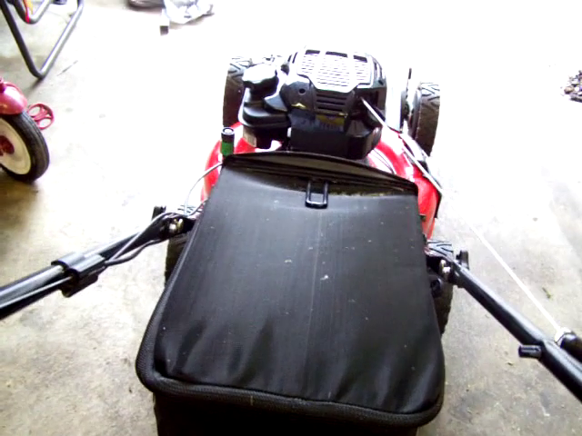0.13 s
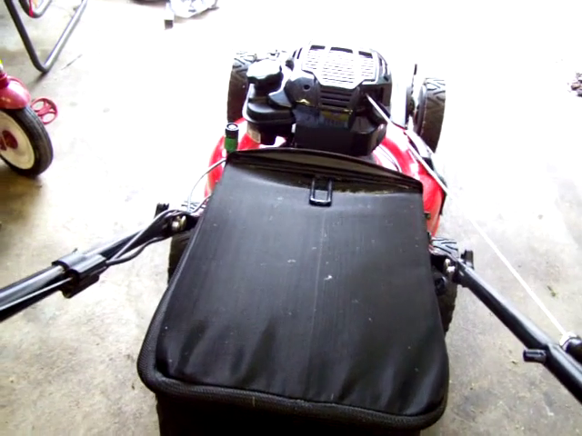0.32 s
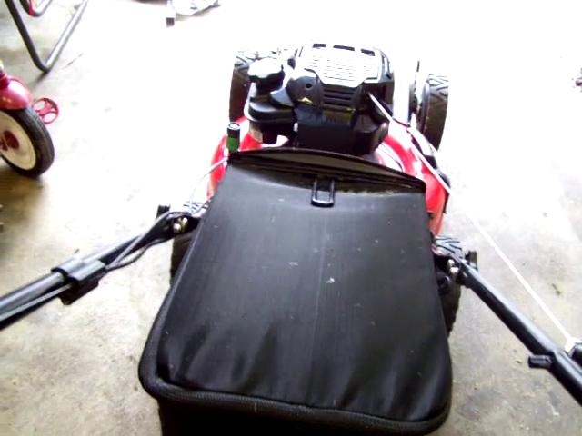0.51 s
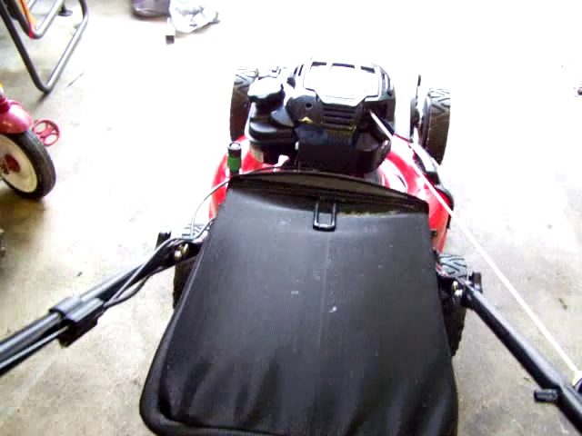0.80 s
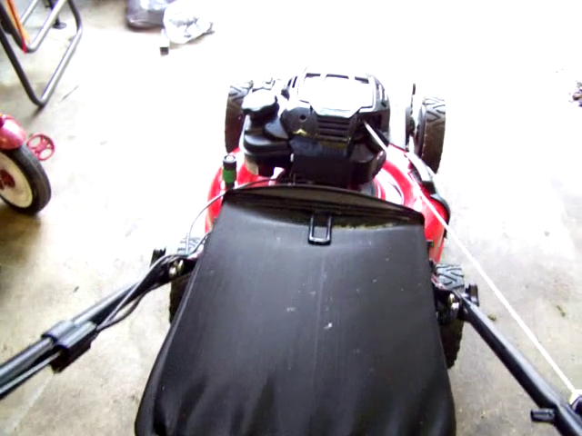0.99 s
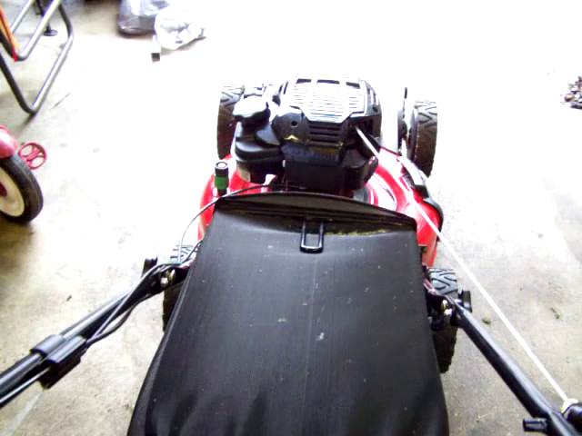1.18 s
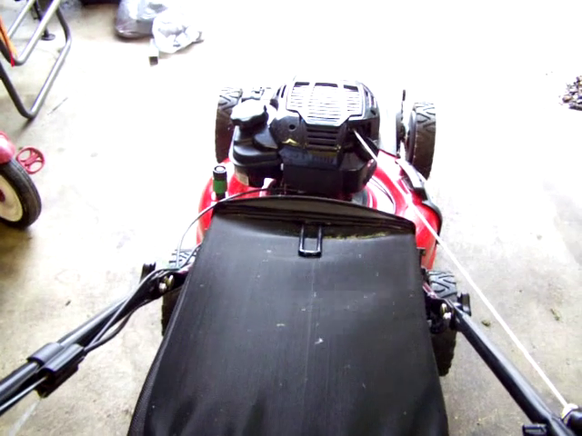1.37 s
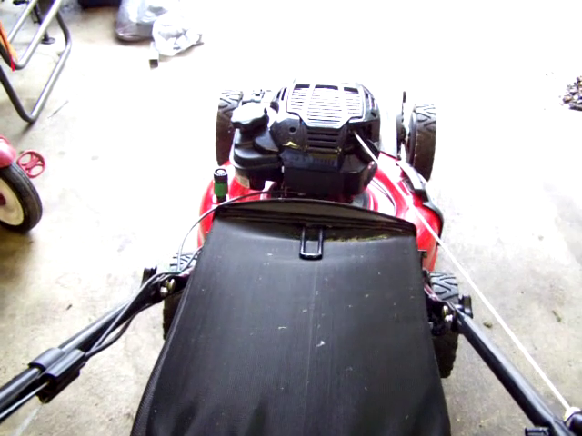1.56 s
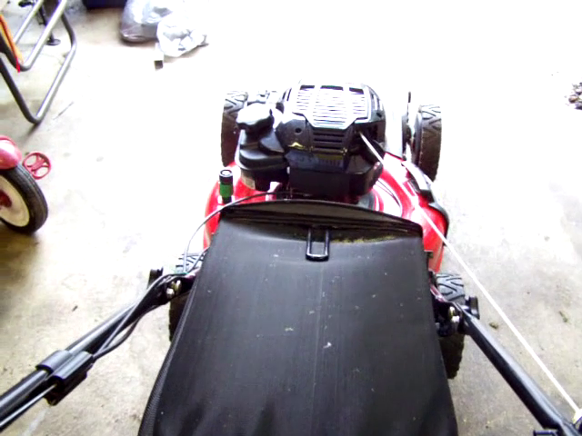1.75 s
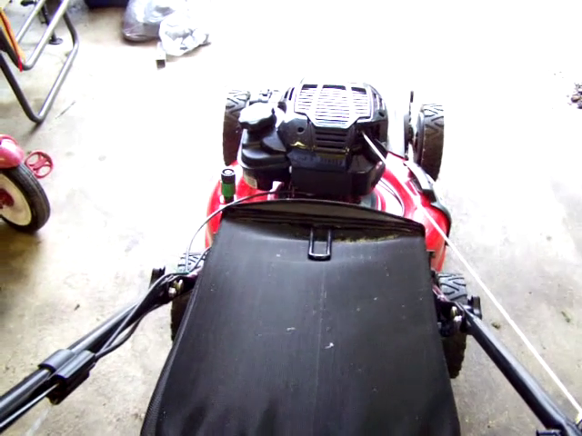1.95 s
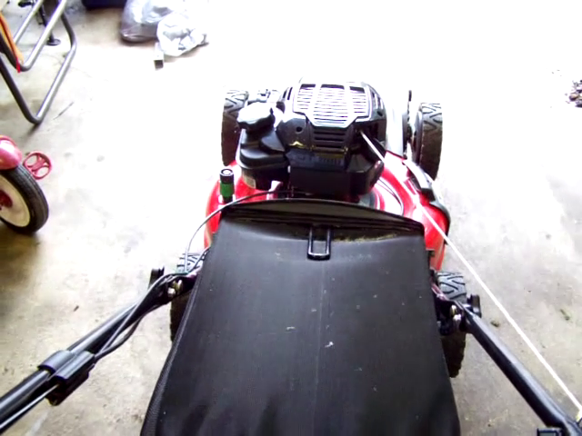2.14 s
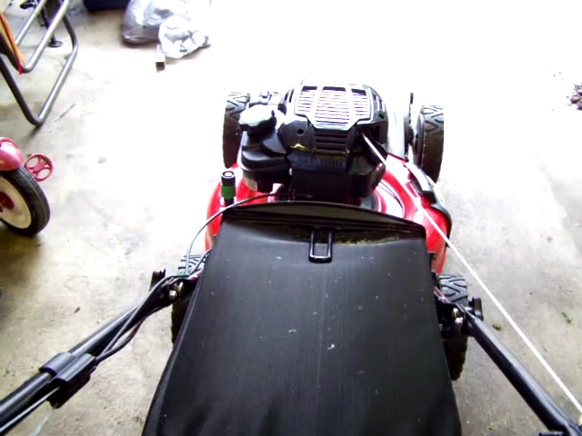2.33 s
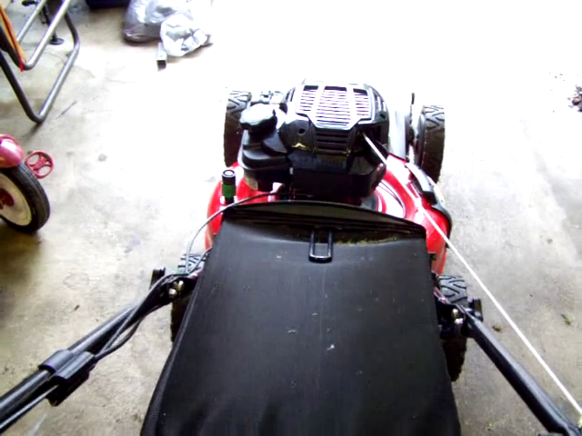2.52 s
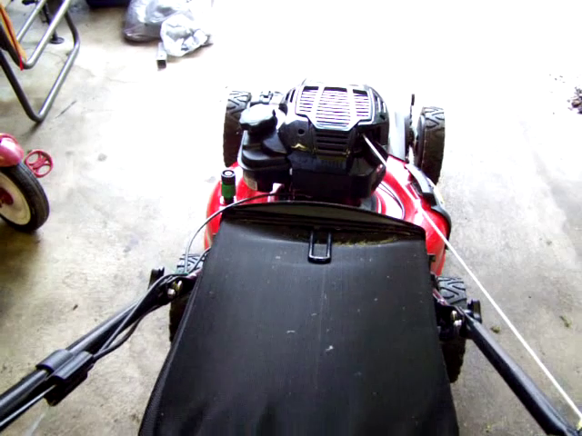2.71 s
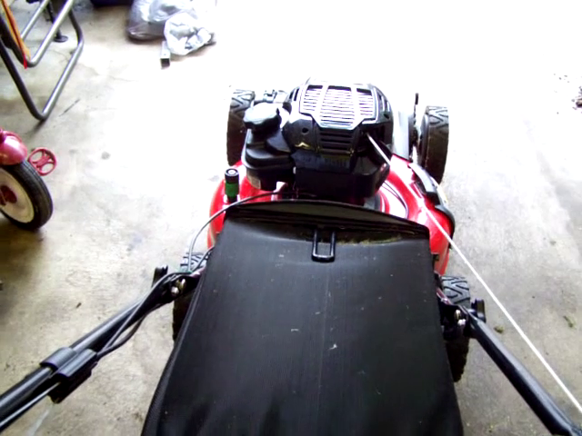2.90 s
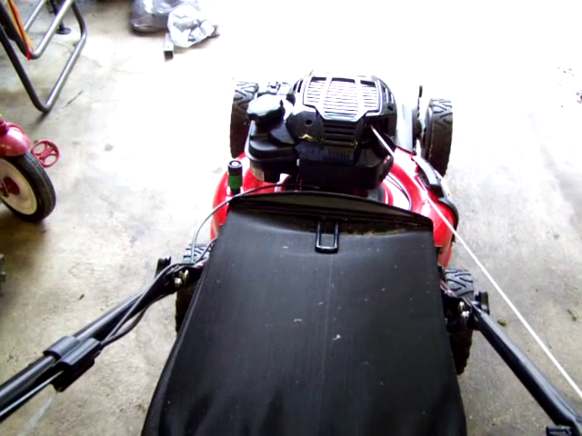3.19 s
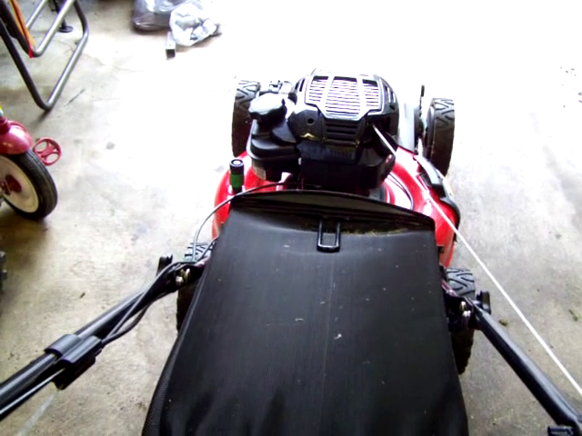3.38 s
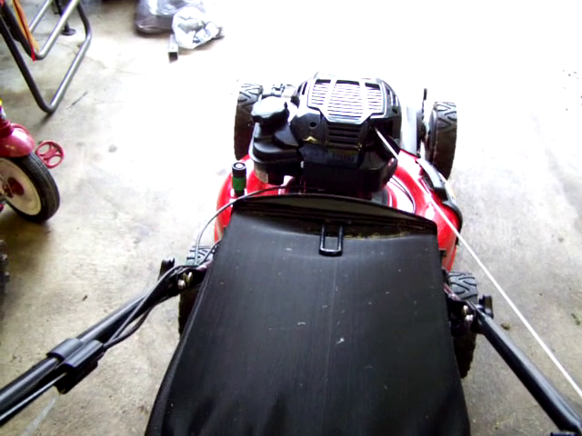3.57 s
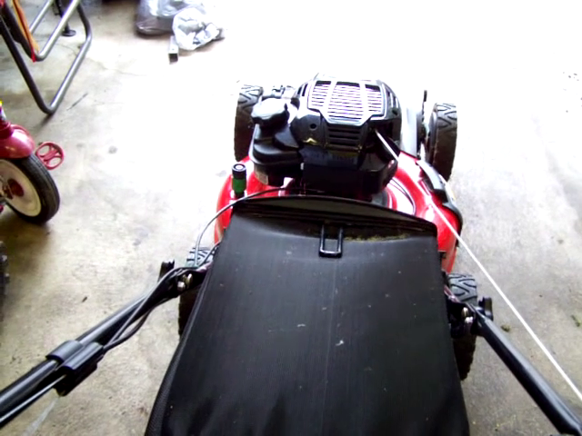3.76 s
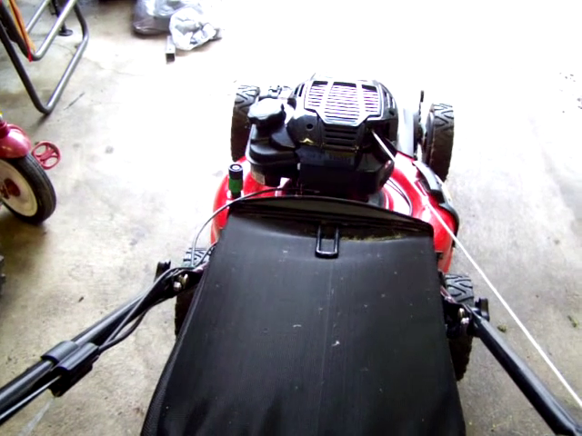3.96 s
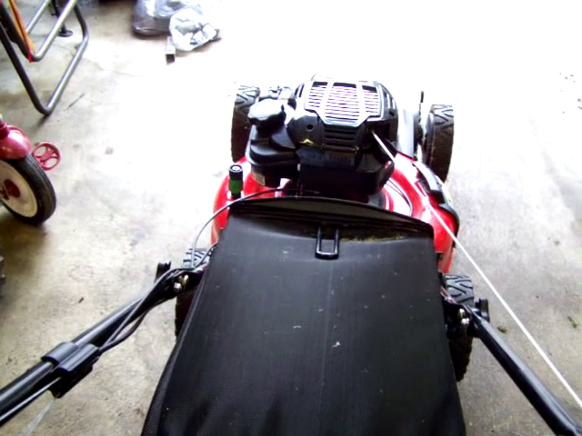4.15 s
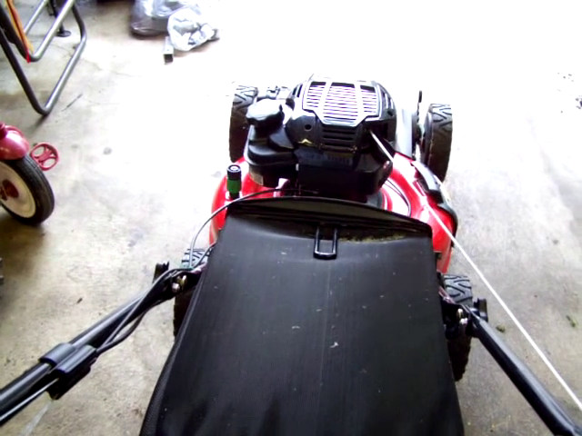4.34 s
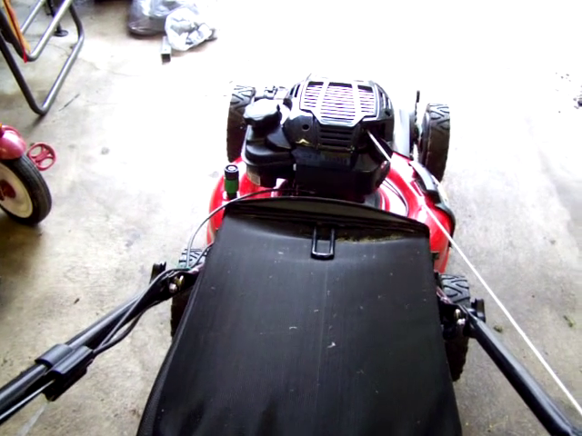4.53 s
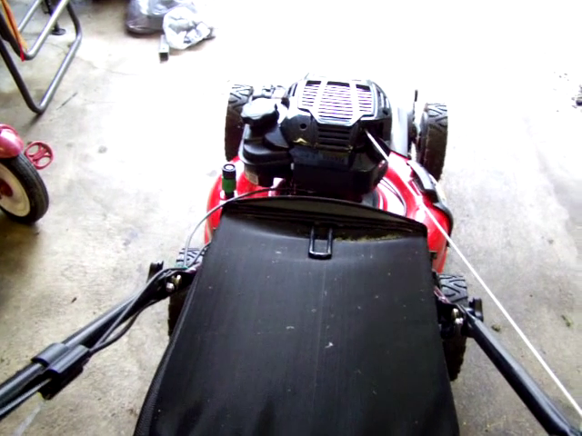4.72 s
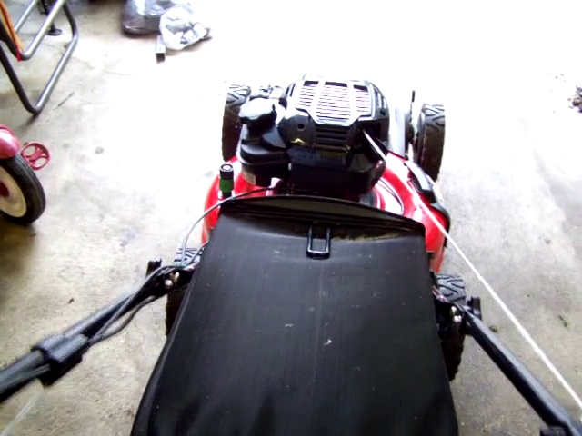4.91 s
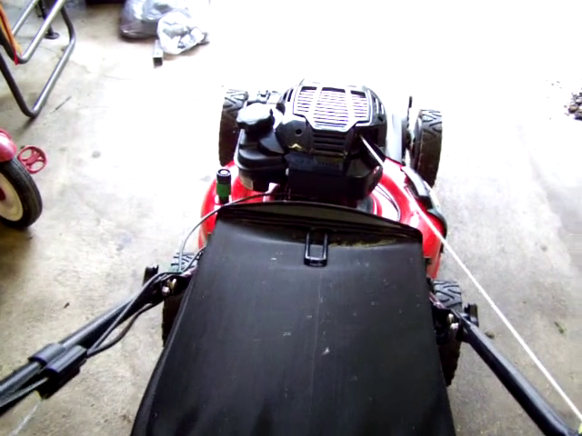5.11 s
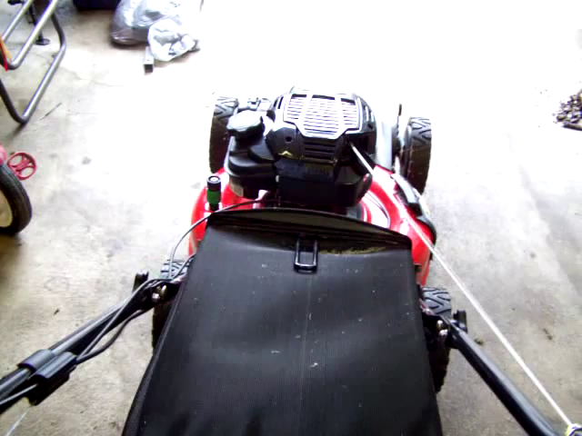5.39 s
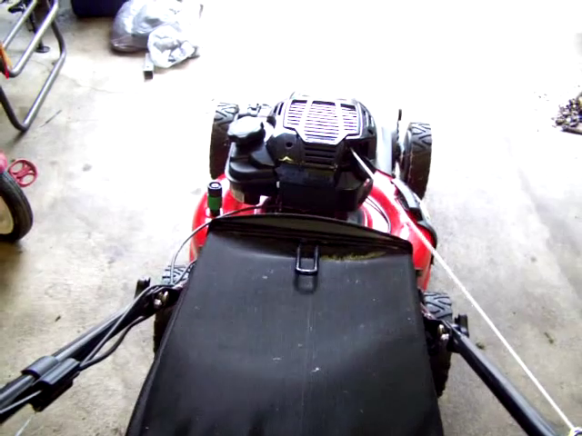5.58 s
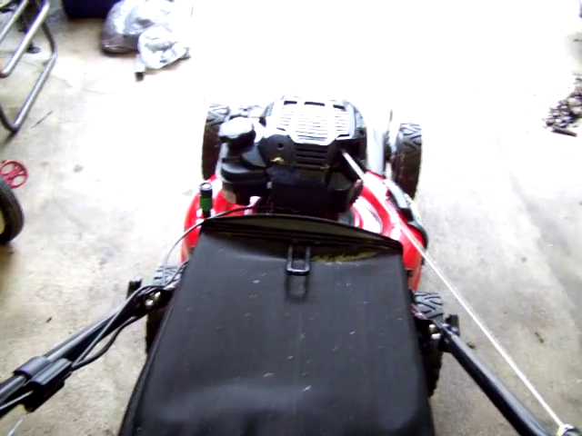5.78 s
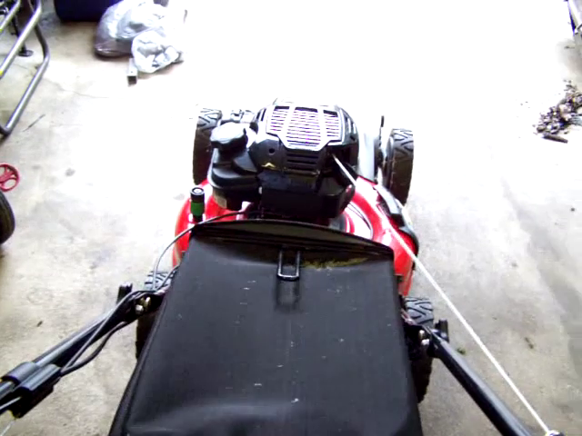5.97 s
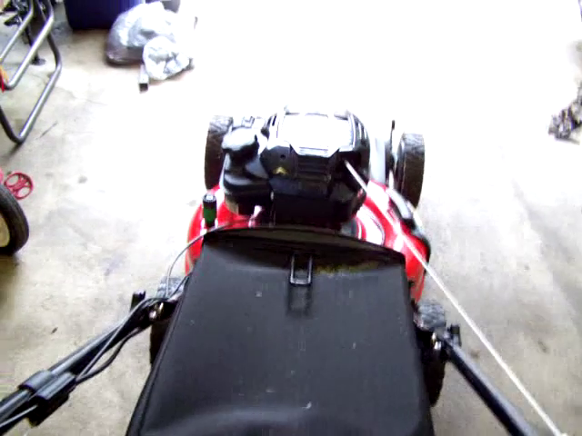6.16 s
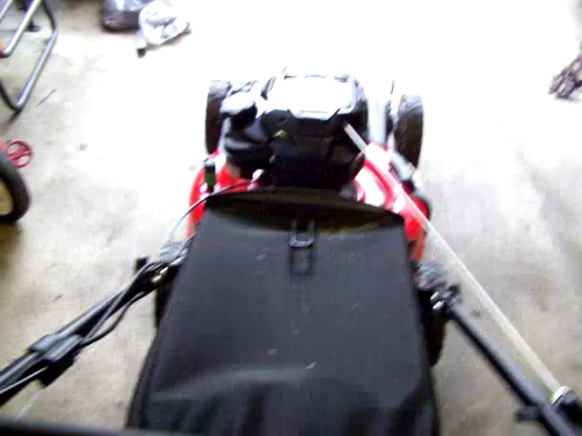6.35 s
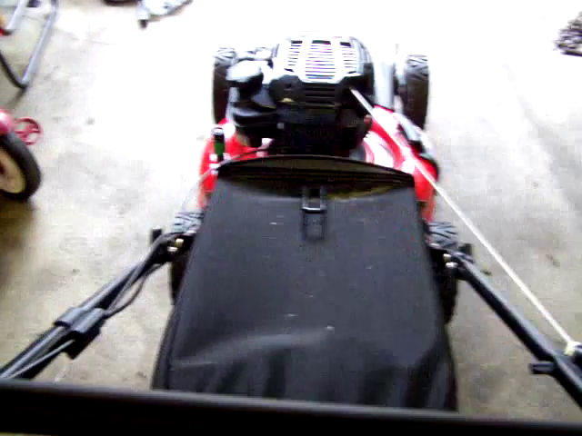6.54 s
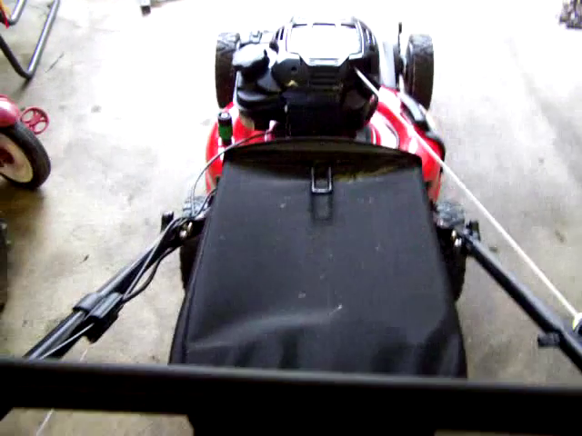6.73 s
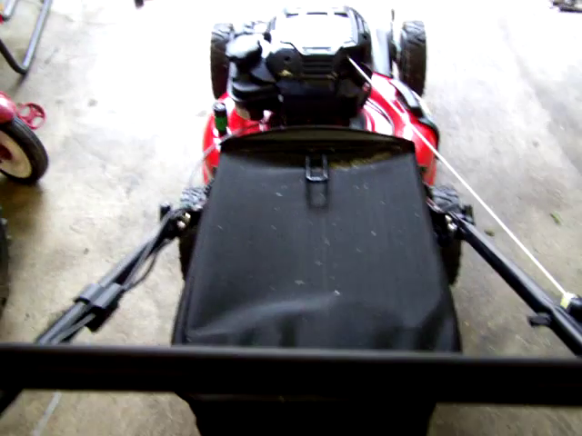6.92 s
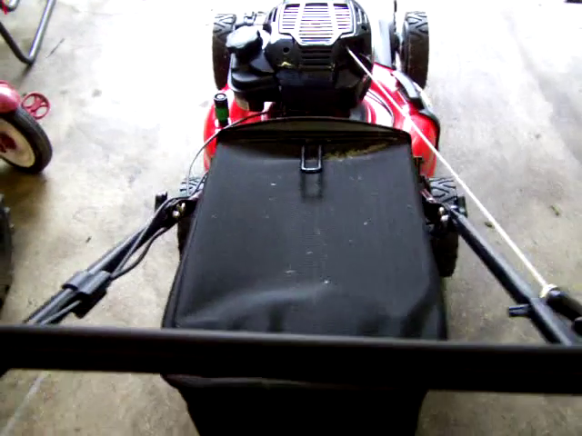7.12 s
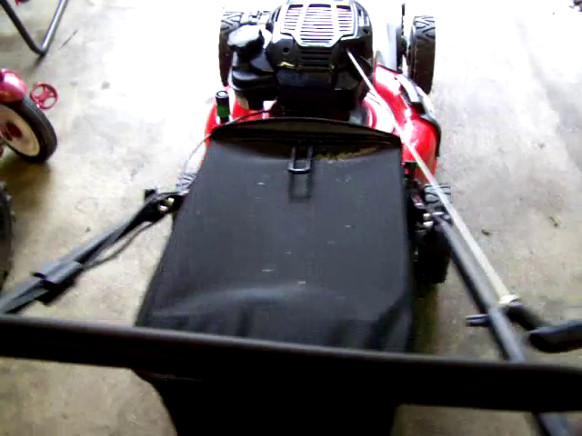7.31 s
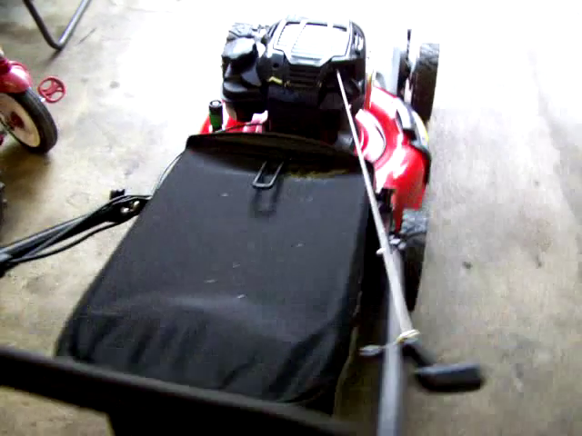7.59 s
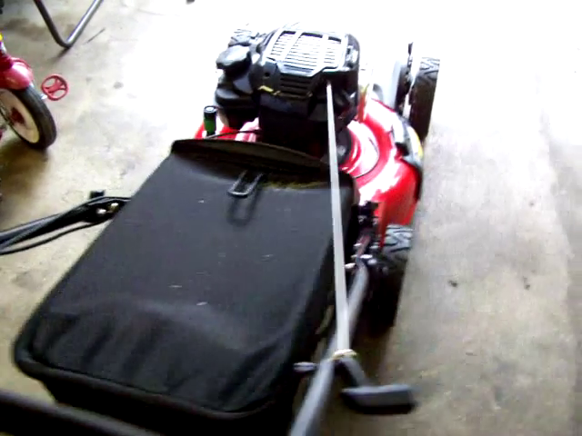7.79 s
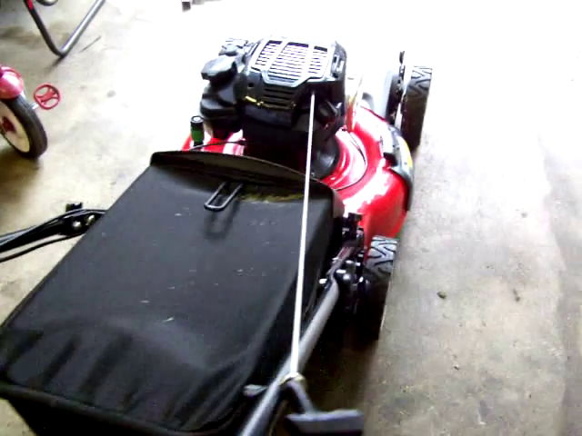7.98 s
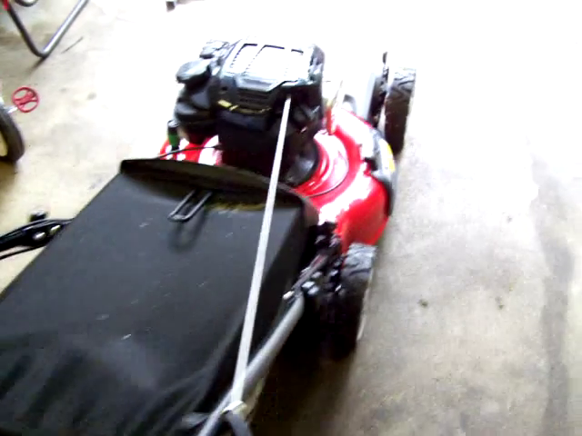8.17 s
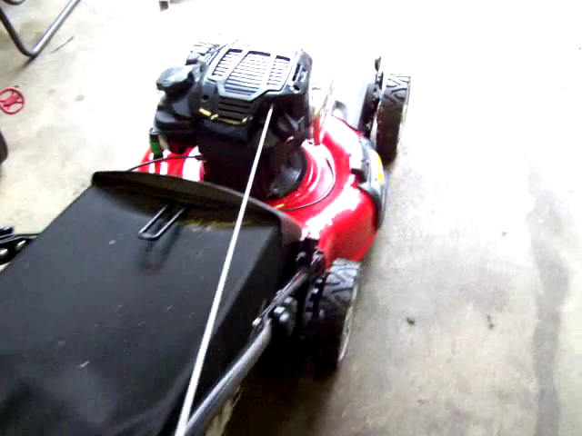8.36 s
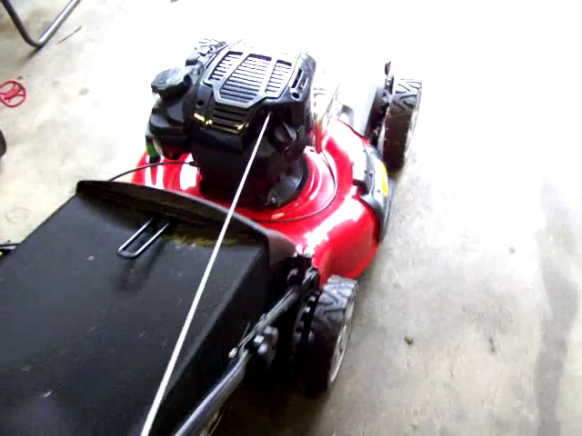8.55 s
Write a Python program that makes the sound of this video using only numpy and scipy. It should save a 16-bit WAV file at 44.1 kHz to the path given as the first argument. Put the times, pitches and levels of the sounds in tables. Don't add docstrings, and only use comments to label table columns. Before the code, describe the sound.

From 0 to about 4.95 seconds a small single-cylinder petrol mower runs at nearly constant speed in a garage: a dense low-mid buzzing drone, fluttering blade wind and metallic deck rattle, with little treble at the very top. At 4.96 the ignition is cut; the firing tone collapses and harmonics glide down quickly until about 5.4. From 5.3 to 5.9 uneven unfired strokes puff, thump, honk and hiss, about a tenth of a second apart, with short thin brake squeals from 5.6. The blade stops at 6.0. The recorder's gain has risen, exposing a distant motor's unsteady hum and soft hiss. At 6.07 comes a loud sharp plastic snap with faint metallic ringing, then ticks and dry finger rubbing until 6.9, more clicks and scuffs around 6.95 to 7.17. Mostly hum follows, slightly thinner after 7.7, with a rub and faint knocks near 8.05 and tiny ones at 8.4 and 8.5.

```python
import sys
import numpy as np
from scipy import signal
from scipy.fft import rfft, irfft, next_fast_len
from scipy.io import wavfile

SR = 44100
rng = np.random.default_rng(int(sys.argv[2]) if len(sys.argv) > 2 else 0)


def inscribe(sig):
    pcm = np.round(np.clip(np.atleast_2d(sig).T, -1, 1) * 32767)
    wavfile.write(sys.argv[1], SR, pcm.astype(np.int16))


def attenuation_scalar(level_db):
    decades = np.asarray(level_db, float) / 20
    return 10 ** decades


N = 379260

CUT_S, STROKES_END_S, STANDSTILL_S = 4.96, 5.785, 5.99


def rms_one(x):
    return x / np.sqrt(np.mean(x ** 2) + 1e-20)


def after(s):
    return np.maximum(np.arange(N) / SR - s, 0)


def drift(rate):
    r = np.exp(-80 * np.pi * rate / SR)
    slow = signal.lfilter([1], [1, -2 * r, r * r], rng.standard_normal(N // 40 + 2002))[2000:]
    return np.interp(np.arange(N) / 40, np.arange(len(slow)), rms_one(slow - slow.mean()))


def resonance(x, hz, width_hz):
    r = np.exp(-np.pi * width_hz / SR)
    top = np.array([1, 0, -1]) * (1 - r * r) / 2
    return signal.lfilter(top, [1, -2 * r * np.cos(2 * np.pi * hz / SR), r * r], x + 1e-18)


def ring(x, hz, t60):
    r, w = attenuation_scalar(-60 / (t60 * SR)), 2 * np.pi * hz / SR
    return signal.lfilter([0, np.sin(w)], [1, -2 * r * np.cos(w), r * r], x + 1e-18)


def above(x, hz):
    return signal.sosfilt(signal.butter(2, hz, "high", fs=SR, output="sos"), x)


def band(low_hz, high_hz):
    edges = signal.butter(2, [low_hz, high_hz], "band", fs=SR, output="sos")
    return rms_one(signal.sosfilt(edges, rng.standard_normal(N)))


def coloured(spectrum, patchy_db):
    size = next_fast_len(N)
    log_hz = np.log(np.arange(1, size // 2 + 2) * SR / size)
    points = np.array(spectrum)
    place = np.log(points[:, 0])
    shaped = rfft(rng.standard_normal(size)) * attenuation_scalar(np.interp(log_hz, place, points[:, 1], -90, -90))
    centres = np.linspace(place[0], place[-1], num=4)
    total = np.zeros(N)
    for one in np.eye(4):
        region = irfft(shaped * np.interp(log_hz, centres, one), size)[:N]
        total += region * attenuation_scalar(patchy_db * drift(2.0))
    return rms_one(total)


def crank_speed():
    # (time [s], speed [cycles/s])
    governed = [(0, 26.32), (.5, 26.28), (.9, 26.3), (1.2, 26.42), (2, 26.35), (2.35, 26.49), (2.6, 26.45),
                (2.9, 26.33), (3.5, 26.36), (3.9, 26.3), (4.6, 26.34), (4.94, 26.42)]
    s, speed = np.transpose(governed)
    braking_per_s2, creep = 27, 5
    return np.maximum(np.interp(np.arange(N) / SR, s, speed) - braking_per_s2 * after(CUT_S), creep)


def crank_angle():
    return 2 * np.pi * np.cumsum(crank_speed()) / SR


def coasting_db(run_db, step_db, sag_db, late_sag_db):
    return (run_db + step_db * np.minimum(after(CUT_S) / .03, 1) - sag_db * after(CUT_S)
            - late_sag_db * after(STROKES_END_S) - 609 * after(STANDSTILL_S))


def engine():
    # (multiple of the cycle rate, level [dB])
    harmonics = [(2, -25), (3, -25), (4, -14), (5, -12), (6, -4), (8, 0), (9, -15), (10, -10), (11, -12),
                 (12, -17), (14, -8), (15, -18), (16, -12), (17, -11), (18, -12), (19, -17), (20, -9),
                 (24, -5), (25, -18), (27, -18), (28, -4), (29, -14), (33, -16), (34, -18), (36, -9),
                 (37, -16), (40, -15), (42, -18), (44, -14), (52, -15)]
    # (frequency [Hz], level [dB per Hz])
    rumble_spectrum = [(30, -49), (60, -37.5), (120, -33), (190, -10), (240, -9.5), (310, -13.5),
                       (400, -7.5), (470, -3), (600, -7), (770, -4.5), (820, -9.5), (1100, -22),
                       (1430, -37), (2400, -91.5)]
    rattle_spectrum = [(530, -27), (900, -4.5), (1100, -1.5), (1200, 2), (1235, 1.5), (1290, 1.5),
                       (1350, 2.5), (1390, 0), (1510, 3), (1545, -5), (1650, -0.5), (2100, -3),
                       (2600, -7.5), (4000, -56)]
    wind_spectrum = [(1060, -18.5), (1800, -13.5), (2570, -8), (4050, -1), (6030, -17), (7320, -17),
                     (7990, -4), (10400, -51.5), (17600, -120)]
    # (running [dB], step at the cut [dB], coasting sag [dB/s], sag after last stroke [dB/s])
    rumble_level = (-29.5, 5.5, 3.3, 57)
    rattle_level = (-22, 1.4, 7.5, 37)
    wind_level = (-17.5, -0.54, 5, 4.5)

    angle = crank_angle()
    wobbles = [drift(5.4) for _ in range(6)]
    tones = np.zeros(N)
    for k, (multiple, db) in enumerate(harmonics):
        phase = rng.uniform(0, 2 * np.pi) + 0.082 * wobbles[(k + 3) % 6]
        tones += attenuation_scalar(db + 0.65 * wobbles[k % 6]) * np.sin(multiple * angle + phase)
    firing_db = -24.5 - 905 * after(CUT_S)

    rumble = attenuation_scalar(coasting_db(*rumble_level)) * coloured(rumble_spectrum, patchy_db=0.8)
    rattle_db = coasting_db(*rattle_level) + 1.0 * np.cos(4 * angle + .6)
    rattle = attenuation_scalar(rattle_db) * coloured(rattle_spectrum, patchy_db=-1.5)
    throb_db = 0.85 * np.cos(4 * angle) + 0.38 * np.cos(angle)
    wind = attenuation_scalar(coasting_db(*wind_level) + throb_db) * coloured(wind_spectrum, patchy_db=0.57)
    return attenuation_scalar(firing_db) * rms_one(tones) + rumble + rattle + wind


def background():
    # (frequency [Hz], level [dB])
    hum_lines = [(61.2, -1), (114.5, -5), (122.5, 0), (127.5, -12), (157, -7), (183.6, -9), (245, 2.5),
                 (254.5, -27.5), (306, -9.5), (369.5, -12), (490, -6.5), (551, -13.5), (611, -20.5),
                 (673, -13.5)]
    # (frequency [Hz], level [dB per Hz])
    low_spectrum = [(18, -37), (30, -4.5), (123, -0.5), (194, -6.5), (248, -3.5), (405, -4), (485, -7.5),
                    (630, -3.5), (1500, -7), (1950, -41), (3300, -120)]
    hiss_spectrum = [(590, -37), (1000, -10), (1400, -8), (2370, -6), (2750, -4.5), (3350, -2),
                     (3800, -4.5), (4300, -9.5), (5450, -18.5), (7000, -26.5), (8000, -6), (8600, -24.5),
                     (12000, -90)]

    gain_db = -22.5 * np.exp(-after(CUT_S) / 0.15)
    turned = np.minimum(after(7.7) / .12, 1)

    t, hum = np.arange(N) / SR, np.zeros(N)
    for hz, db in hum_lines:
        line_db = db + 1.2 * drift(1.5) - 3 * turned * (hz < 300)
        hum += attenuation_scalar(line_db) * np.sin(2 * np.pi * (hz * t + rng.random()))
    hum *= attenuation_scalar(-32 + gain_db) / np.std(hum[:SR])

    low = attenuation_scalar(-34.5 + 0.35 * gain_db) * coloured(low_spectrum, patchy_db=0.4)
    hiss = attenuation_scalar(-28.5 + gain_db + 1.1 * turned) * coloured(hiss_spectrum, patchy_db=.8)
    gathered = rms_one(resonance(rng.standard_normal(N), 3280, 330))
    gathered *= turned * attenuation_scalar(-32.5 - 40 * after(6.9))
    return gathered + hum + low + hiss


def glides():
    multiples = [3, 4, 8, 12, 20, 24, 30]
    # (frequency [Hz], width [Hz], level [dB])
    passages = [(72, 12, -32), (170, 24, -25.5), (232, 14, -26), (286, 20, -26), (362, 20, -29),
                (465, 40, -27)]

    speed, angle = crank_speed(), crank_angle()
    total = np.zeros(N)
    for multiple in multiples:
        tone = attenuation_scalar(1.7 * drift(24.0)) * np.sin(multiple * angle + rng.uniform(0, 2 * np.pi))
        total += tone * sum(attenuation_scalar(db) * np.exp(-((multiple * speed - hz) / width_hz) ** 2)
                            for hz, width_hz, db in passages)
    fade_in, fade_out = after(CUT_S) / .02, 1 - after(5.36) / .05
    return total * np.clip(np.minimum(fade_in, fade_out), 0, 1)


def burst(s, rise_s, decay_s):
    t = after(s)
    return (1 - np.exp(-t / rise_s)) * np.exp(-t / decay_s)


def pipe(push, modes):
    fall = np.exp(-1 / (.004 * SR))
    gust = signal.lfilter([3 * (1 - fall)], [1, -fall], above(push, 90))
    gust = gust * (1 + .6 * band(150, 900))
    soft = signal.sosfilt(signal.butter(2, 700, fs=SR, output="sos"), gust + 1e-18)
    return sum(attenuation_scalar(db) * np.roll(ring(soft, hz, t60), 260 * k) for k, (hz, db, t60) in enumerate(modes))


def puffs():
    # (time [s], exhaust thump [dB], intake honk [dB], valve hiss [dB])
    strokes = [
        (5.308, -24, -14, -30),
        (5.367, -21, -13, -25),
        (5.443, -20, -7, -20),
        (5.525, -17.5, -10, -18),
        (5.63, -24, -9, -16),
        (5.723, -16, -13, -28),
        (5.795, -35, -30, -19),
        (5.902, -27, -30, -21.5),
    ]
    # (frequency [Hz], level [dB], t60 [s])
    exhaust_modes = [(71.4, -4, 0.14), (179, 10, 0.074), (297, 3.5, 0.05), (740, -14, .03)]
    intake_modes = [(367, -2, 0.062), (476, -0.5, 0.21), (543, -5, .07)]

    s, thump_db, honk_db, hiss_db = np.transpose(strokes)
    lag_s = .041
    at, later = (s * SR).astype(int), ((s + lag_s) * SR).astype(int)
    exhaust, intake = np.zeros(N), np.zeros(N)
    exhaust[at], exhaust[later] = attenuation_scalar(thump_db), attenuation_scalar(thump_db - 7)
    intake[at], intake[later] = attenuation_scalar(honk_db - 5), attenuation_scalar(honk_db)
    leak = sum(attenuation_scalar(db) * burst(start, 0.0014, 0.021) for start, db in zip(s, hiss_db))
    return pipe(exhaust, exhaust_modes) + pipe(intake, intake_modes) + band(2900, 8800) * leak


def brake():
    # (time [s], level [dB], pitch [Hz], length [s])
    squeals = [
        (5.616, -22, 1640, 0.054),
        (5.688, -23.5, 2160, 0.057),
        (5.791, -25, 1660, 0.06),
        (5.798, -21, 2380, 0.05),
        (5.876, -22, 2090, .07),
        (5.942, -24.5, 2360, 0.063),
    ]
    t, noise = np.arange(N) / SR, rng.standard_normal(N)
    out = np.zeros(N)
    for s, db, hz, length in squeals:
        bite = np.clip(np.minimum((t - s) / 0.0046, (s + length - t) / 0.015), 0, 1)
        out += attenuation_scalar(db) * rms_one(resonance(noise, hz, 130)) * bite
    return out


def strike(s):
    hit = np.zeros(N)
    hit[round(s * SR) + np.arange(5)] = .11, .22, .34, .22, .11
    return hit


def clicks():
    # (time [s], level [dB])
    knocks = [(6.0706, 3), (6.0722, -5), (6.1893, -7), (6.2402, -11), (6.2545, -17), (6.351, -10),
              (6.968, -11), (7.139, -5), (7.149, -9), (7.156, -16), (8.088, -14), (8.1, -14), (8.404, -18),
              (8.52, -19)]
    # (time [s], level [dB], pitch [Hz], t60 [s])
    snaps = [
        (6.0706, 11, 3150, .011),
        (6.0716, 5, 2500, .012),
        (6.0724, 2, 1700, .01),
        (6.071, -4, 330, .014),
        (6.2518, 7.5, 3900, .0035),
        (6.9612, 0, 3400, .0035),
        (7.149, -9, 1450, .03),
        (7.145, -15, 900, .03),
        (8.088, -17, 3900, .008),
        (8.1, -19, 3600, .008),
    ]
    # (frequency [Hz], level [dB], t60 [s])
    lever_modes = [(2512, -2, .22), (3200, -3, .1), (3700, -4, .14), (4183, 0, .11), (4880, -3, .1),
                   (5400, -6, .12)]

    hits = sum(attenuation_scalar(db) * strike(s) for s, db in knocks)
    t60_s = .026
    out = ring(hits, 2180, t60_s) + .3 * ring(hits, 1700, t60_s * .4) + .45 * ring(hits, 2550, t60_s * .4)
    out = 1.15 * resonance(out, 2200, 1100)
    lever_hit = attenuation_scalar(-26) * strike(6.072)
    out += sum(ring(attenuation_scalar(db) * lever_hit, hz, t60) for hz, db, t60 in lever_modes)
    for s, db, hz, t60 in snaps:
        hit = attenuation_scalar(db) * strike(s)
        overtones = .3 * ring(hit, 5400, t60 * .6) - .3 * ring(hit, 4300, t60 * .6)
        overtones -= .45 * ring(hit, 6800, t60 * .5)
        out += above(ring(hit, hz, t60) + overtones, .65 * hz)
    return out


def rubbing():
    # (start [s], length [s], swell [s], housing ring [dB], friction above the ring [dB])
    rubs = [(6.206, 0.035, .03, -26.5, -4.5), (6.256, .24, .08, -20, -7.5), (6.494, .041, 0.011, -17, -10),
            (6.609, .022, .02, -25, 1.5), (6.66, 0.2, .03, -41, 5), (6.9, 0.083, .03, -33.5, -0.5),
            (6.987, .06, .012, -28.5, -10.5), (7.079, 0.071, 0.021, -26.5, -8),
            (7.129, .05, .012, -23, -13), (7.151, 0.023, .008, -34, 13.5), (8.022, .098, 0.06, -16.5, -11),
            (8.393, 0.014, 0.016, -28, -16.5), (8.496, 0.034, 0.023, -36.5, -14)]
    # (frequency [Hz], width [Hz], level [dB])
    housing = [(925, 97, -14.5), (1495, 280, -9.5), (2254, 240, 2), (3380, 400, -10.5)]

    size = attenuation_scalar(1.4 * np.minimum(rng.exponential(1, N), 3))
    slips = (rng.random(N) < 4000 / SR) * size * rng.choice([-1, 1], N)
    clumps = attenuation_scalar(1.7 * np.clip(drift(90.0), -1.5, 1.3))
    body = np.zeros(N)
    for k, (hz, width, db) in enumerate(housing):
        once = resonance(slips * clumps, hz, width * 1.9)
        body += attenuation_scalar(db) * resonance(once, hz, width * 1.9) * (-1) ** k
    body = rms_one(body)
    friction = band(2900, 5200) * np.sqrt(clumps) + attenuation_scalar(-16) * band(5300, 8200)

    out = np.zeros(N)
    for s, length, swell_s, ring_db, friction_db in rubs:
        shape_db = 15 * (np.minimum(after(s) / swell_s, 1) - 1) - 1804 * after(s + length)
        out += (after(s) > 0) * attenuation_scalar(ring_db + shape_db) * (body + attenuation_scalar(friction_db) * friction)
    return out


def scene():
    return (engine() + background() + glides() + puffs() + brake() + clicks() + rubbing())[None]


def top_cut(x):
    return signal.sosfilt(signal.butter(12, 8140, fs=SR, output="sos"), x)


def record(dry):
    thin = above(dry, 52)
    narrow = signal.sosfilt(signal.cheby2(10, 60, 8750, fs=SR, output="sos"), thin)
    return top_cut(np.clip(narrow, -1, 1))


dry = scene()
out = record(dry)
inscribe(out)
```